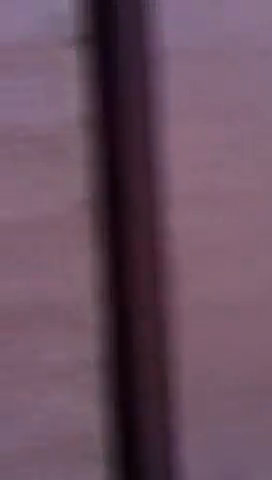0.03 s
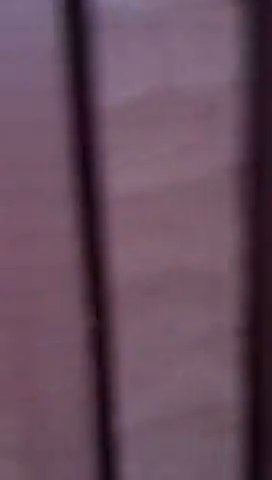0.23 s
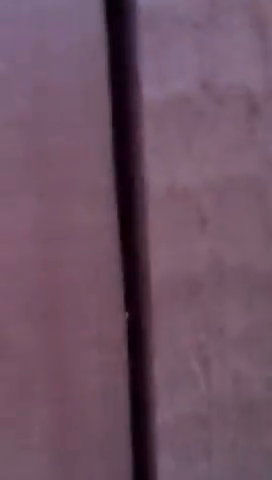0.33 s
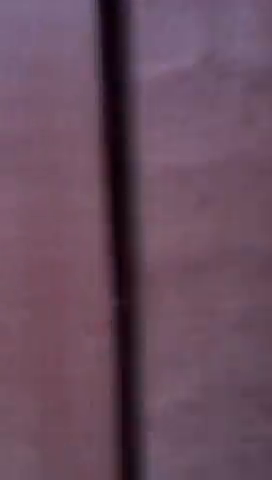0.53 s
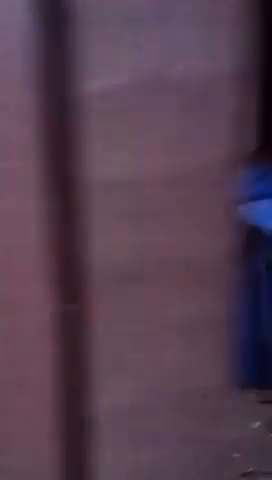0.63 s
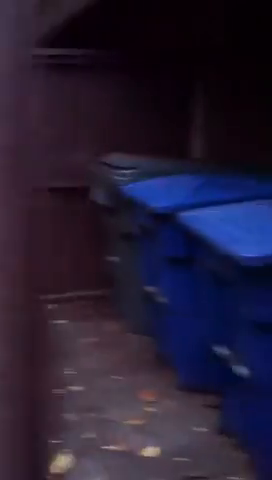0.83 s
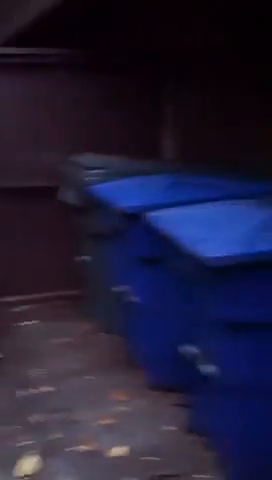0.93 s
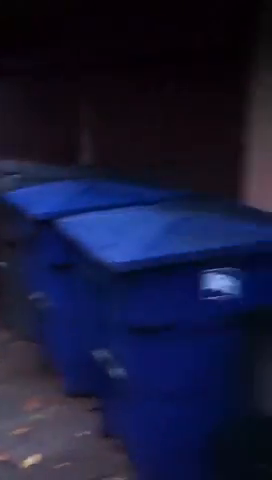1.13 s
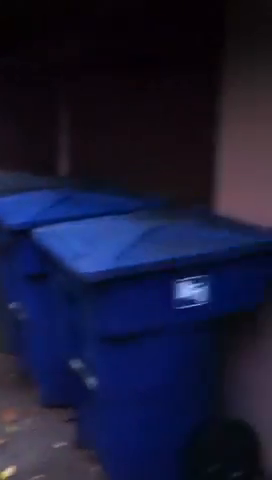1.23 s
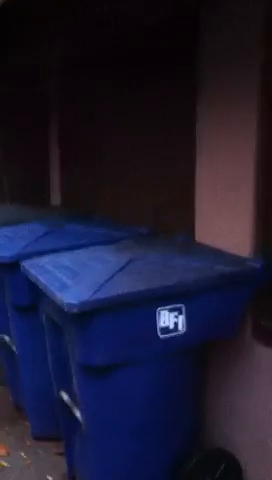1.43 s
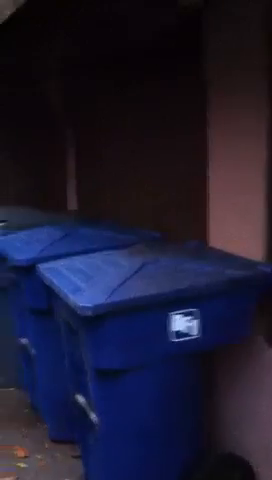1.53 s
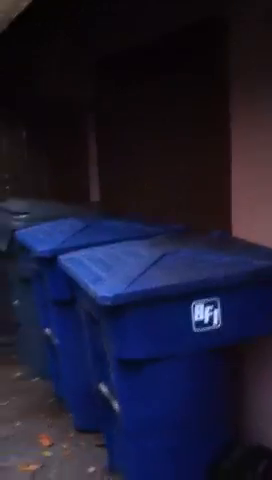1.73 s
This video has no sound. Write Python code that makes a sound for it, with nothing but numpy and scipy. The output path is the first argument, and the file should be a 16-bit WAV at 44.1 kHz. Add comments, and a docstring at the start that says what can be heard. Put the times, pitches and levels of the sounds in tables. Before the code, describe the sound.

A wooden gate is opened close by: its metal bolt squeals and clacks, then come small creaks, gritty scuffs and a knock with a light latch ring. The covered yard echoes softly over a faint hum and distant rumble.

```python
"""A short squealing scrape, close to the microphone: a steel slide bolt is drawn and a wooden gate
judders free of its post. The gate sticks and slips in brief chirping creaks as it swings, then the
boards knock and the loose latch rings. Small gritty scuffs fall in between. The place is a covered
bin yard that echoes each sound, with a faint hum and a distant outdoor rumble behind."""
import sys
import numpy as np
from scipy import signal
from scipy.fft import rfft, irfft
from scipy.io import wavfile

SR = 44100
rng = np.random.default_rng(int(sys.argv[2]) if len(sys.argv) > 2 else 0)


def dump_mix(stems):
    """Bounce the given channels to the path in sys.argv[1] as a 16-bit WAV at rate SR."""
    frames = np.atleast_2d(stems).T  # one column per channel
    limited = np.clip(frames, -1, 1)  # hard clip at full scale
    pcm = np.round(limited * 32767).astype(np.int16)
    wavfile.write(sys.argv[1], SR, pcm)


N = 79380

# friction of the bolt in its sleeve: time_s, level_db
BOLT_FRICTION = [(.12, -69.5), (.165, -60.5), (.188, -46), (.195, -36), (.206, -36.5), (.226, -30.5),
                 (.236, -24), (.25, -25), (.272, -21), (.287, -20), (.299, -27.5), (.306, -60),
                 (.32, -87.5)]
# spectrum of scraping steel: frequency_hz, density_db
SCRAPE_SPECTRUM = [(100, -20.5), (550, -6.5), (1150, 2.5), (3500, -6.5), (8600, -8), (10500, -8),
                   (12400, -22), (13800, -59.5)]
# resonances of the bolt and sleeve: frequency_hz, gain_db
BOLT_MODES = [(2050, 3.5), (2360, 8), (4350, 2), (4720, 5), (6020, -2), (8210, 7), (10300, 3.5),
              (14550, 31)]
# brief squeals and rasping resonances of the steel bolt and the creaking wooden gate:
# peak_s, half_length_s, pitch_hz, wander_hz, level_db
FRICTION_SQUEALS = [(.196, .0039, 7080, 140, -33), (.220, .012, 7070, 70, -34.5),
                    (.237, .012, 10740, 90, -32), (.239, .01, 7180, 24, -16.5),
                    (.254, .017, 2868, 25, -23.5), (.262, .011, 7130, 40, -21),
                    (.264, .0087, 1765, 30, -21), (.571, .0036, 5530, 330, -36.5),
                    (.5722, .003, 1450, 100, -27), (1.194, .009, 3800, 110, -58),
                    (1.305, .028, 2590, 4, -65)]
# creaks of the gate: peak_s, rise_s, fall_s, pitch_hz, glide_octaves_per_s, level_db,
# second_harmonic_drop_db, roughness (0-1)
GATE_CREAKS = [(.181, 0.017, 0.034, 867, 3, -34.5, 59, 0.53), (.286, 0.011, 0.0065, 787, -1, -15, 21, .25),
               (.300, 0.014, 0.011, 563.3, -5.5, -16, 5, 0.15),
               (.5705, 0.0057, 0.0068, 537, -1, -22, 8, 0.25),
               (.578, 0.0063, 0.018, 502.4, 0.5, -34.5, 3.5, .45),
               (.699, 0.014, 0.0095, 556.5, -2.5, -35, 8.5, .16),
               (.724, 0.0094, 0.007, 594, -5.5, -38.5, 8.5, .2),
               (.848, 0.0066, 0.029, 600.5, 1.5, -44.5, 23, .12),
               (1.111, 0.0062, 0.038, 582, -0.5, -50.5, 20, 0.18),
               (1.433, 0.0023, 0.0024, 685, -3, -38.5, 24, 0.7),
               (1.512, .022, 0.0088, 902, 1.5, -38, 7.5, 0.38),
               (1.530, 0.004, 0.019, 605, -1, -30.5, 26, 0.39),
               (1.697, 0.015, 0.0085, 710, 1.5, -49, 22, 0.34),
               (1.791, 0.0078, 0.01, 673, 3.5, -34.5, 38, 0.29)]
# spectrum of the rasp in a creak: frequency_hz, density_db
RASP_SPECTRUM = [(120, -28), (380, -16), (1100, 5), (1500, 5), (2600, 1.5), (4400, -3.5), (7000, -10),
                 (10500, -17), (13500, -41)]
# knocks of bolt, gate and latch: start_s, wood_db, click_db, click_tilt_db_per_octave, steel_db
GATE_KNOCKS = [(.193, -34, -31.5, 4, -61), (0.2774, -21.5, -20, -1.5, -64), (0.282, -25, -20, 1.5, -66),
               (.2905, -18.5, -25, 0, -65), (1.4215, -41.5, -73, 0, -80), (1.518, -25, -26, 0, -66),
               (1.5218, -35.5, -31, -2, -39.5), (1.5425, -36, -43, -2, -72), (1.785, -43.5, -66, -10, -87)]
# modes of the gate boards: pitch_hz, relative_db
BOARD_MODES = [(160, -9.5), (238, -1), (318, -2.5), (460, -3), (590, 12.5), (700, 7), (790, 5), (1250, 1.5),
               (1480, -4.5), (1850, 2.5)]
# modes of the loose latch: pitch_hz, relative_db, t60_s
LATCH_MODES = [(5001, -15.5, .5), (5884, -10, 0.23), (6342, -2.5, .29), (6665, -3.5, 0.2),
               (6950, -7.5, .11), (10100, -9.5, 0.16), (11840, -25.5, 0.28), (13380, -33, .25),
               (14600, -27.5, .14)]
# spectrum of a hard contact: frequency_hz, density_db
CLICK_SPECTRUM = [(100, -11.5), (550, 5), (1800, 7), (2400, -1), (3200, 2.5), (6500, -7), (10500, -17),
                  (14000, -50)]
# small scuffs and rustles: start_s, rise_s, decay_s, level_db, tilt_db_per_octave
GRITTY_SCUFFS = [(.48, 0.03, 0.038, -51, -1), (0.61, 0.0025, 0.016, -47.5, 0.5),
                 (0.653, 0.018, 0.032, -55.5, 0.5), (.818, 0.0036, 0.029, -53, -5),
                 (1.186, 0.0007, 0.027, -53.5, 0), (1.244, 0.014, 0.041, -56, -2),
                 (1.405, 0.0012, 0.054, -47, 0.5), (1.419, 0.0044, 0.072, -42, -5),
                 (1.523, 0.0038, 0.028, -36, -5.5), (1.674, 0.0005, 0.012, -48.5, -3.5),
                 (1.71, 0.016, 0.059, -56, -0.5)]
# spectrum of rubbed grit: frequency_hz, density_db
GRIT_SPECTRUM = [(100, -12), (700, 7), (4500, -2), (11000, -10), (15500, -28.5)]
# reverberation of the covered yard: frequency_hz, t60_s
YARD_DECAY = [(200, 1), (700, 0.682), (9000, 0.67), (15000, .35)]
# faint hum that comes up as the gate opens: time_s, level_db
HUM_LEVEL = [(.3, -78), (1.15, -58.5), (1.8, -56)]
# spectrum of the distant outdoor rumble: frequency_hz, density_db
RUMBLE_SPECTRUM = [(30, -39), (60, -16), (160, -2), (270, -4.5), (500, -11), (1600, -24), (10000, -40.5),
                   (15000, -60.5)]

BOLT_WIDTH_HZ, LIGHT_TILT_DB_PER_OCTAVE = 170, -6.5
PITCH_JITTER, RASP_DB = .22, -6  # both at full roughness
SLIP_DECAY_CYCLES = .41
BOARD_T60_S, BOARD_DAMPING = .084, .23  # at 600 Hz; higher modes die sooner by this power
TAIL_DB, FENCE_DB, FENCE_T60_S, ECHO_DELAY_S = -22.5, -16, .1, .011
SQUEAL_SEND_DB, CREAK_SEND_DB = -6, -2  # squeals and creaks echo less than the contacts
HUM_HZ, RUMBLE_DB = 307.4, -56
LOW_CUT_HZ, HIGH_CUT_HZ = 110, 15650


def bolt_scrape():
    """The bolt grinds through its sleeve and excites its resonances, brighter when pressed harder."""
    friction = level(BOLT_FRICTION)
    grit = grains() * amp(2.6 * wander(rate_hz=350))
    steel = grit + sum(amp(db) * signal.lfilter(*signal.iirpeak(hz, hz / BOLT_WIDTH_HZ, fs=SR), grit)
                       for hz, db in BOLT_MODES)
    bright = coloured(steel, SCRAPE_SPECTRUM)
    dull = coloured(steel, SCRAPE_SPECTRUM, LIGHT_TILT_DB_PER_OCTAVE)
    pressure = np.sqrt(friction / friction.max())
    return friction * (pressure * bright + (1 - pressure) * dull)


def friction_squeal(peak_s, half_length_s, pitch_hz, wander_hz, level_db):
    """A resonance of the steel bolt or the creaking wooden gate squeals or rasps for a moment."""
    cycles = np.cumsum(pitch_hz + wander_hz * wander(rate_hz=80 + 5 * wander_hz)) / SR
    tone = unit(np.sin(2 * np.pi * cycles))
    flutter_db = 1.5 * wander(rate_hz=240)
    return amp(level_db + flutter_db) * swell(peak_s, half_length_s, half_length_s) * tone


def gate_creak(peak_s, rise_s, fall_s, pitch_hz, glide, level_db, drop_db, roughness):
    """The gate sticks and slips hundreds of times a second; each slip rasps."""
    octaves = np.clip(glide * (clock() - peak_s), -1, 1)
    slip_hz = pitch_hz * 2 ** octaves * (1 + PITCH_JITTER * roughness * wander(rate_hz=350))
    cycles = np.cumsum(slip_hz) / SR
    tone = unit(sum(amp(-drop_db * k ** 1.6) * np.cos(2 * np.pi * (k + 1) * cycles) for k in range(3)))
    slips = np.exp(-(cycles % 1) / SLIP_DECAY_CYCLES)
    rasp = amp(RASP_DB) * roughness * coloured(slips * rng.standard_normal(N), RASP_SPECTRUM)
    flutter = 1 + .5 * roughness * wander(rate_hz=640)
    return amp(level_db) * swell(peak_s, rise_s, fall_s) * (tone * flutter + rasp)


def gate_knock(start_s, wood_db, click_db, tilt, steel_db):
    """A hard contact clicks, thumps the boards and rings the latch."""
    noise = coloured(rng.standard_normal(N), CLICK_SPECTRUM, tilt)
    click = burst(start_s, rise_s=.0012, decay_s=.0056) * noise
    damped_modes = [(hz, db, BOARD_T60_S * (600 / hz) ** BOARD_DAMPING) for hz, db in BOARD_MODES]
    boards = amp(wood_db) * ring(start_s, damped_modes)
    latch = amp(steel_db) * ring(start_s, LATCH_MODES)
    return boards + amp(click_db) * click + latch


def scuff(start_s, rise_s, decay_s, level_db, tilt):
    """Gritty surfaces rub briefly and unevenly."""
    envelope = amp(level_db + 1.52 * wander(rate_hz=400)) * burst(start_s, rise_s, decay_s)
    return envelope * coloured(grains(), GRIT_SPECTRUM, tilt)


def yard_echo(sound):
    """Quick reflections reach the microphone from the near fence; the covered yard adds a tail."""
    hz, t, spectra = signal.stft(rng.standard_normal(N), SR, nperseg=256)
    decay = amp(-60 * t / at_frequency(YARD_DECAY, hz)[:, None])
    tail = signal.istft(spectra * decay, SR, nperseg=256)[1][:N]
    sparse_reflections = rng.standard_normal(N) * (rng.random(N) < .03)
    fence = sparse_reflections * amp(-60 * clock() / FENCE_T60_S)
    arrived = clock() > ECHO_DELAY_S
    response = sum(amp(db) * part * arrived / np.linalg.norm(part * arrived)
                   for db, part in [(TAIL_DB, tail), (FENCE_DB, fence)])
    return signal.fftconvolve(sound, response)[:N]


def faint_hum():
    """A low tone wavers in pitch and grows behind the gate."""
    cycles = np.cumsum(HUM_HZ + 1.7 * wander(rate_hz=8.8)) / SR
    return level(HUM_LEVEL) * unit(np.sin(2 * np.pi * cycles))


def distant_rumble():
    """Steady low outdoor noise from far beyond the yard."""
    return amp(RUMBLE_DB) * coloured(rng.standard_normal(N), RUMBLE_SPECTRUM)


def amp(db):
    """Decibels to gain."""
    return 10 ** (np.asarray(db) / 20)


def unit(x):
    """Scales to rms 1."""
    return x / np.sqrt(np.mean(x ** 2) + 1e-20)


def clock():
    """Time of every sample in seconds."""
    return np.arange(N) / SR


def level(points):
    """Gain along a curve of time_s, level_db."""
    return amp(np.interp(clock(), *np.transpose(points)))


def at_frequency(points, hz):
    """Interpolates a table on a log-frequency axis."""
    table_hz, values = np.transpose(points)
    return np.interp(np.log(hz + 1), np.log(table_hz + 1), values)


def coloured(x, spectrum, tilt=0):
    """Filters by a spectrum, tilted in dB per octave above 500 Hz, and scales to rms 1."""
    hz = np.fft.rfftfreq(N, 1 / SR)
    gain_db = at_frequency(spectrum, hz) + tilt * np.log2(np.maximum(hz, 500))
    return unit(irfft(rfft(x) * amp(gain_db), N))


def wander(rate_hz):
    """Smooth random drift of rms 1, up to about the given rate."""
    hz = np.fft.rfftfreq(N, 1 / SR)
    return unit(irfft(rfft(rng.standard_normal(N)) * np.exp(-(hz / rate_hz) ** 2), N))


def grains():
    """Dense tiny impacts of uneven size."""
    return rng.standard_normal(N) * amp(.5 * np.minimum(rng.exponential(1, N), 5))


def swell(peak_s, rise_s, fall_s):
    """Rounded rise to a peak and rounded fall."""
    t = clock() - peak_s
    return np.exp(-(t / np.where(t < 0, rise_s, fall_s)) ** 2)


def burst(start_s, rise_s, decay_s):
    """Straight attack, exponential release."""
    t = clock() - start_s
    return np.clip(t / rise_s, 0, 1) * np.exp(-np.maximum(t - rise_s, 0) / decay_s)


def ring(start_s, modes):
    """Struck modes of alternating sign die away, each at its own rate."""
    t = np.maximum(clock() - start_s, 0)
    ringing = sum((-1) ** k * amp(db - 60 * t / t60_s) * np.sin(2 * np.pi * hz * t)
                  for k, (hz, db, t60_s) in enumerate(modes))
    return ringing * np.sqrt(2) / np.linalg.norm([amp(db) for _, db, _ in modes])


def scene():
    """One microphone by the gate: bolt and boards close, the yard around, hum and rumble behind."""
    squeals = sum(friction_squeal(*row) for row in FRICTION_SQUEALS)
    creaks = sum(gate_creak(*row) for row in GATE_CREAKS)
    contacts = bolt_scrape() + sum(gate_knock(*row) for row in GATE_KNOCKS)
    contacts += sum(scuff(*row) for row in GRITTY_SCUFFS)
    echo = yard_echo(contacts + amp(SQUEAL_SEND_DB) * squeals + amp(CREAK_SEND_DB) * creaks)
    return (contacts + squeals + creaks + echo + faint_hum() + distant_rumble())[None]


def record(dry):
    """The microphone signal passes the recorder's low cut and steep band limit."""
    low_cut = signal.butter(2, LOW_CUT_HZ, "highpass", fs=SR, output="sos")
    band_limit = signal.firwin(511, HIGH_CUT_HZ, window=("kaiser", 9), fs=SR)
    return signal.oaconvolve(signal.sosfilt(low_cut, dry), band_limit[None], "same")


dry = scene()
out = record(dry)
dump_mix(out)
```